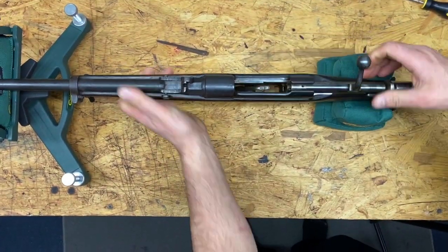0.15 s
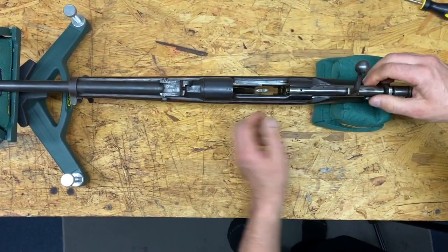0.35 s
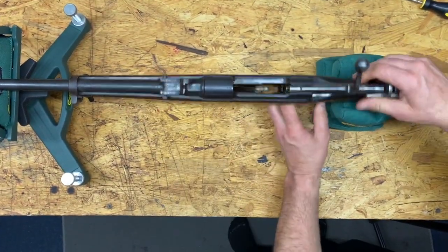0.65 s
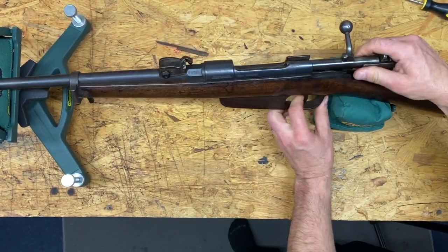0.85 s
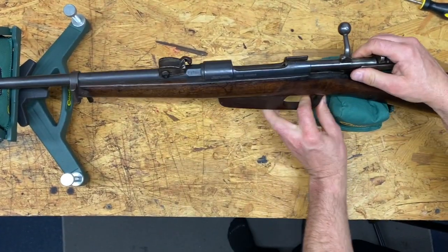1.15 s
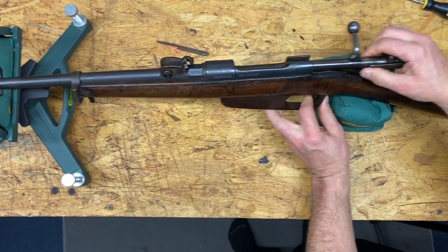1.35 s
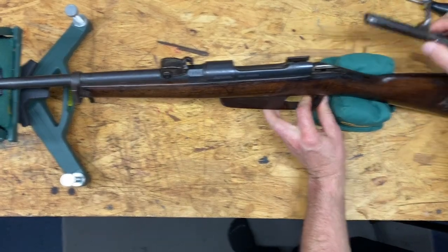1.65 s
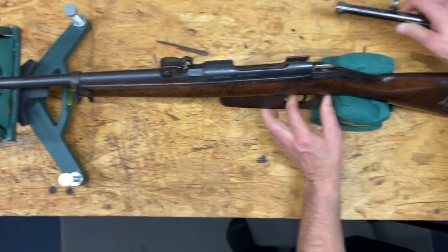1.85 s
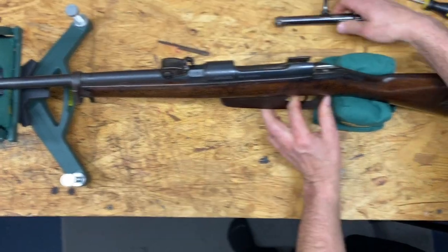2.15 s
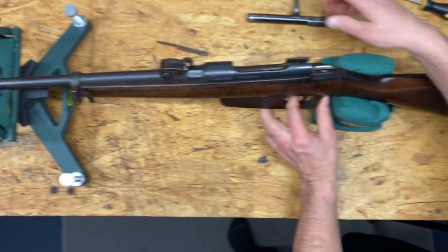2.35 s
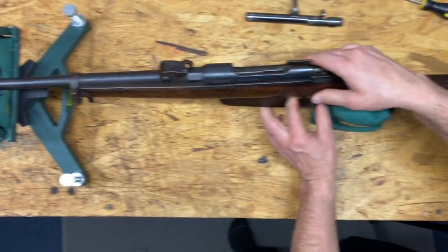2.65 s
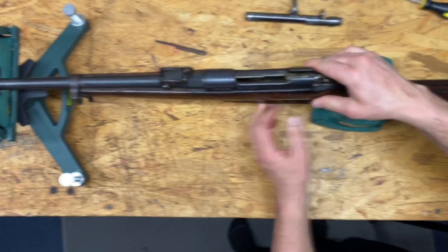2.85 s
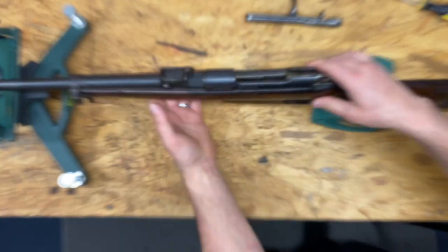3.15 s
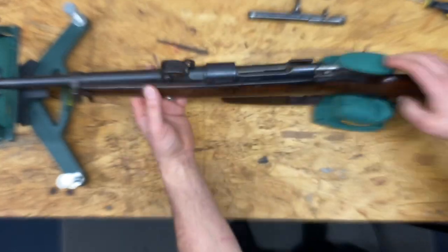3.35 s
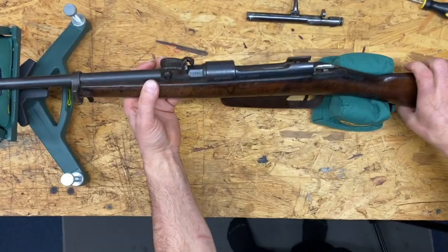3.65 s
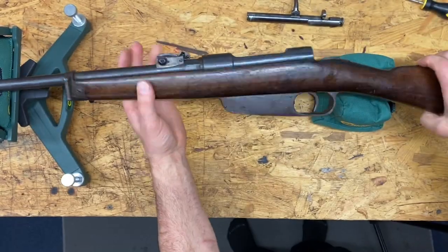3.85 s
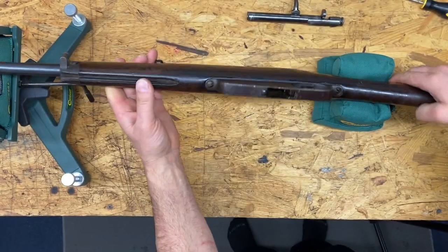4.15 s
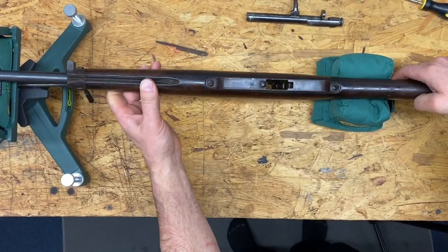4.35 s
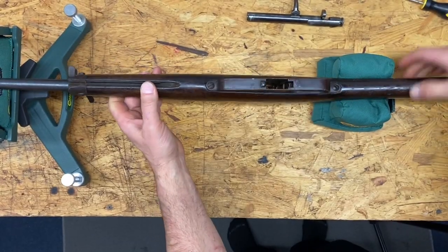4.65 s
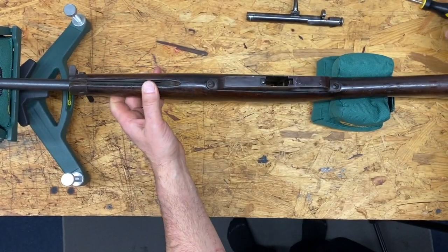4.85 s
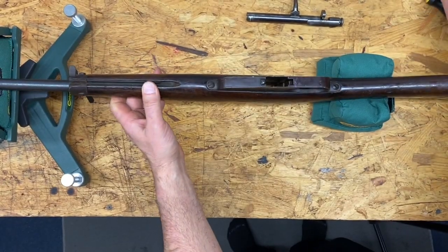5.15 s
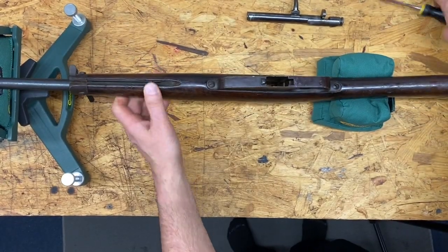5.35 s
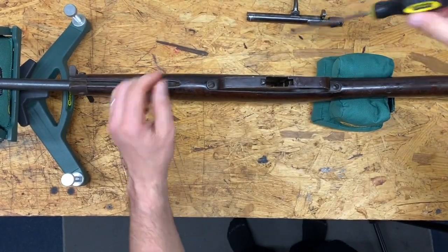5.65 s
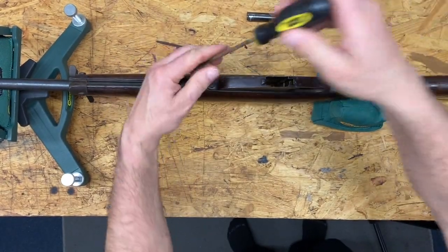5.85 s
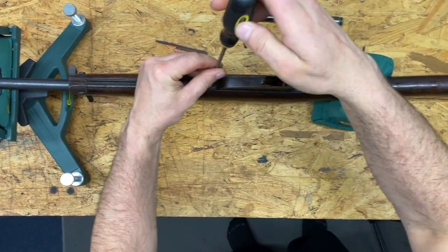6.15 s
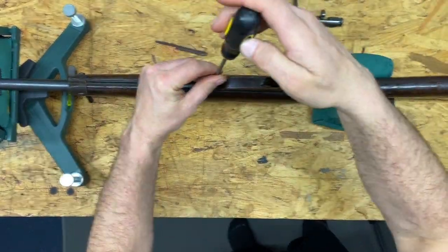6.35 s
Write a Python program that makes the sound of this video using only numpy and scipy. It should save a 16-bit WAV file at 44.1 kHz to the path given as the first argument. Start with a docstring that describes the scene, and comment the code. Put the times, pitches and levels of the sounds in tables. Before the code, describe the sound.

Close steel clicks and soft handling, a heavy wooden clunk as a bolt is set down, a short rasping scrape, two faint screw taps.

```python
"""A bolt-action rifle is handled on a wooden workbench in a small room, heard close up.
Its bolt is opened, drawn out and laid on the boards: noise clatter plus ringing modes for each contact.
The rifle is rolled over on its bag and scrapes in its rest, as stick-slip noise through resonances.
A screwdriver taps twice on a screw. The bench booms in low decaying sines and trembles as filtered noise;
hands stroke the stock in swells of noise, dry ticks snap, and a faint whine of sines comes and goes."""
import sys
import numpy as np
from scipy import signal
from scipy.fft import rfft, irfft, next_fast_len
from scipy.io import wavfile
from scipy.ndimage import uniform_filter1d, map_coordinates

SR = 44100
rng = np.random.default_rng(int(sys.argv[2]) if len(sys.argv) > 2 else 0)


def unload_wav(signal):
    """Save mono or channel-first audio to the path in sys.argv[1] as 16-bit WAV at rate SR, clipped to [-1, 1]."""
    wavfile.write(
        sys.argv[1],
        SR,
        np.round(np.clip(np.atleast_2d(signal).T, -1, 1) * 32767).astype(np.int16),
    )


N = 286650  # length in samples
SCENE_T = np.arange(N) / SR  # seconds through the scene
T = np.arange(SR * 3 // 5) / SR  # seconds through one hit
TOP_HZ = 16300  # upper band limit


def amp(db):
    """Decibels to gain."""
    return 10 ** (np.asarray(db) / 20)


def unit(x):
    """Scale to rms 1."""
    return x / np.sqrt(np.mean(x ** 2) + 1e-20)


def fade(t60):
    """Exponential decay over one hit, falling 60 dB in t60 seconds."""
    return np.exp(-np.log(1000) * T / t60)


def along(points, hz):
    """Interpolate (Hz, value) points on a log frequency axis."""
    f, v = np.transpose(points)
    return np.interp(np.log(hz + 1), np.log(f + 1), v)


def curves(rows):
    """One value per sample for each column after the time."""
    s, *columns = np.transpose(rows)
    return [np.interp(SCENE_T, s, column) for column in columns]


def wobble(rate):
    """A smooth random curve, rate knots a second."""
    knots = rng.standard_normal(int(N * rate / SR) + 4)
    return map_coordinates(knots, [np.arange(N) * rate / SR])


def filtered(x, response):
    """Multiply the spectrum of x by a response of frequency."""
    n = x.shape[-1]
    m = next_fast_len(n + SR // 8)
    return irfft(rfft(x, m) * response(np.fft.rfftfreq(m, 1 / SR)), m)[..., :n]


def colour(points):
    """Response through (Hz, dB) points."""
    return lambda hz: amp(along(points, hz))


def body(peaks):
    """Causal response of (Hz, width in Hz, dB) resonances, summed with alternating sign."""
    def response(f):
        total = 0
        for k, (centre, width, db) in enumerate(peaks):
            damping = 1j * f * width
            total = total + (-1) ** k * amp(db) * damping / (centre * centre - f * f + damping)
        return total
    return response


def causal(x, points):
    """Minimum-phase filter through (Hz, dB) points: nothing sounds before the blow."""
    m = next_fast_len(x.shape[-1] + SR // 8)
    cepstrum = irfft(np.log(colour(points)(np.fft.rfftfreq(m, 1 / SR))), m)
    cepstrum[1:m // 2] *= 2  # fold the spectrum's phase forward in time
    cepstrum[m // 2 + 1:] = 0
    return irfft(rfft(x, m) * np.exp(rfft(cepstrum)), m)[..., :x.shape[-1]]


# How alike left and right are. Each row: frequency in Hz, likeness from 0 to 1.
ALIKE = [(60, 0.98), (150, .95), (350, 1), (700, 0.33), (1400, 0.25), (3000, 0.52), (6000, 0.16),
         (10000, 0.12)]
# How the stereo image leans. Each row: frequency in Hz, left minus right in dB.
LEAN = [(60, 1.7), (300, -1.5), (700, -0.5), (1400, 0.5), (3000, 3.5), (6000, 1.5), (10000, 0)]


def spread(pair):
    """Blend two unrelated signals into left and right: alike in the bass, mostly unrelated in the treble."""
    def mid_side_gains(hz):
        turn = np.arccos(np.clip(along(ALIKE, hz), -1, 1)) / 2
        return np.array([np.cos(turn), np.sin(turn)])
    mid, side = filtered(pair, mid_side_gains)
    left_right = np.array([mid + side, mid - side])
    return filtered(left_right, lambda hz: amp(np.outer([.5, -.5], along(LEAN, hz))))


def noise(response, size, grain_db=0):
    """A pair of coloured noises of rms 1; grain_db clumps them into tiny slips."""
    clumps = np.repeat(rng.standard_normal(size // 32 + 1), 32)[:size]
    return unit(filtered(rng.standard_normal((2, size)) * amp(grain_db * clumps), response))


def peak(x):
    """Highest rms over 4 ms of the mean of the two channels."""
    return np.sqrt(np.max(uniform_filter1d(x.mean(0) ** 2, SR // 250)) + 1e-20)


def add(track, s, sound):
    """Mix a sound into the track at time s."""
    start = max(round(s * SR), 0)
    part = track[:, start:start + sound.shape[-1]]
    part += sound[..., :part.shape[-1]]


# Decay of the small room. Each row: frequency in Hz, t60 in seconds.
ROOM = [(150, 0.37), (400, 0.2), (1000, 0.16), (4000, 0.16), (8000, 0.12), (14000, 0.11)]


def room_tail():
    """A pair of diffuse noise tails, scaled to energy 1 on the first; the treble dies first."""
    hz, t, z = signal.stft(rng.standard_normal((2, len(T))), SR, nperseg=256)
    decay = np.exp(-np.log(1000) * t / along(ROOM, hz)[:, None])
    tail = signal.istft(z * decay, SR, nperseg=256)[1][:, :len(T)]
    tail = tail * (1 - fade(0.013))  # the tail builds up gently
    return tail / np.linalg.norm(tail[0])


def in_room(x, room_db):
    """The sound plus the room's diffuse answer."""
    return x + amp(room_db) * signal.fftconvolve(x[:1], room_tail(), axes=1)[:, :x.shape[-1]]


def walls(pair, echo_db, count=10):
    """Weak early echoes off the bench and walls ripple the spectrum."""
    echoes = np.zeros((2, SR // 50))
    for channel in echoes:
        delays = rng.integers(SR // 1000, len(channel), count)
        channel[delays] = amp(echo_db) * rng.standard_normal(count)
    echoes[:, 0] = 1  # direct sound
    echoes /= np.linalg.norm(echoes, axis=1, keepdims=True)
    return signal.fftconvolve(pair, echoes, axes=1)[:, :N]


def swell(s, half_s):
    """A bell-shaped rise and fall around time s."""
    return np.exp(-.5 * ((SCENE_T - s) / half_s) ** 2)


def lagging(x, lag_s):
    """A level that follows x and dies away after it."""
    keep = np.exp(-1 / (lag_s * SR))
    return signal.lfilter([1 - keep], [1, -keep], x)


# Bands that set a contact's hardness: body, knock, clink, edge. Each row: low edge in Hz, high edge in Hz.
BANDS = [(150, 600), (600, 2000), (2000, 6000), (6000, 16000)]
TOP_FALL = 0.28  # share of the drop from clink to edge that continues above


def strikes(rows, modes, crack_colour, crack_t60, ring_db, room_db, scatter_db, attack_s):
    """Each contact is a short clatter plus the object's modes; hardness sets the balance from body to edge."""
    track = np.zeros((2, N))
    hz, level, t60 = np.transpose(modes)
    # loose, hand-held parts blur their modes: the phase drifts
    drift = np.cumsum(rng.standard_normal((len(hz), len(T))), 1) * np.sqrt(2 * np.pi * .008 * hz[:, None] / SR)
    waves = np.exp(1j * (2 * np.pi * hz[:, None] * T + drift)) * fade(t60[:, None])
    for s, *levels_db in rows:
        sizes = amp(level + scatter_db * rng.standard_normal(len(hz)))
        phases = np.exp(2j * np.pi * rng.random((2, len(hz))))
        ring = ((sizes * phases) @ waves).real / np.linalg.norm(amp(level))
        clatter = in_room(noise(colour(crack_colour), len(T)) * fade(crack_t60), room_db)
        hit = spread(clatter + amp(ring_db) * ring) * (1 - fade(attack_s))
        hardness = []
        for (lo, hi), db in zip(BANDS, levels_db):
            band = filtered(hit, lambda f: (f > lo) & (f < hi))
            hardness.append((np.sqrt(lo * hi), db - 20 * np.log10(peak(band))))
        # small parts radiate no deep bass
        bass = [(25, hardness[0][1] - 30), (100, hardness[0][1])]
        # the softer the contact, the faster its highest treble falls away
        top = [(TOP_HZ, hardness[-1][1] + TOP_FALL * min(levels_db[-1] - levels_db[-2], 0))]
        add(track, s, causal(hit, bass + hardness + top))
    return track


# When the rifle lies untouched: from and to, in seconds.
HANDS_OFF = (5.43, 5.9)
LET_GO_S = .1  # time to take hold or let go
FIDGET_DB, FIDGET_PER_S = 4, 6.3  # the hold is never quite steady


def holding():
    """About 1 while the hands hold the rifle, 0 while it lies untouched."""
    off, on = HANDS_OFF
    grip = np.clip(np.maximum(off - SCENE_T, SCENE_T - on) / LET_GO_S + .5, 0, 1)
    return grip * amp(FIDGET_DB * wobble(FIDGET_PER_S))


# The stock rocking on its bag. Each row: middle in seconds, level in dB.
SHIFTS = [(0.009, -44.5), (0.089, -55), (0.155, -59), (0.235, -45.5), (0.285, -49), (0.572, -49.5),
          (0.681, -37.5), (0.95, -48.5), (1.32, -52.5), (1.4, -44.5), (2.2, -28), (2.809, -36.5),
          (3.356, -36), (3.409, -51), (4.34, -51.5), (5.1, -46.5)]
SHIFT_HALF_S = 0.017  # half length of a rock


def rocking():
    """How hard the stock presses into its bag, as a chain of short swells."""
    return sum(amp(db) * swell(s, SHIFT_HALF_S) for s, db in SHIFTS)


# A hand or the oiled bolt slides. Each row: middle in seconds, half length in seconds, hiss in dB, rub in dB.
STROKES = [(0.0, 0.027, -52.5, -45.5), (0.132, 0.071, -60, -60.5), (0.246, 0.0082, -63.5, -59),
           (0.575, 0.016, -51.5, -51), (0.693, 0.012, -62, -47), (0.751, 0.086, -60, -57),
           (0.934, 0.035, -56, -53), (1.05, 0.056, -69, -64), (1.338, 0.023, -58, -47.5),
           (1.417, 0.016, -50, -39.5), (2.216, 0.038, -70.5, -48), (2.597, 0.065, -73.5, -76),
           (2.717, 0.026, -69, -72), (2.804, 0.027, -77, -59.5), (3.04, 0.093, -70, -67),
           (3.25, 0.11, -67.5, -65.5), (3.344, 0.025, -53.5, -50.5), (3.526, 0.044, -67.5, -78.5),
           (3.655, 0.037, -62.5, -66.5), (3.799, .033, -63, -76.5), (3.958, 0.096, -70.5, -70),
           (4.154, 0.023, -60.5, -61), (4.264, 0.07, -58.5, -56), (4.46, 0.076, -68.5, -70.5),
           (4.823, 0.023, -62, -62.5), (4.968, 0.17, -69.5, -75.5), (5.104, 0.014, -51, -63),
           (5.843, 0.011, -69, -82), (6.098, 0.17, -76.5, -70.5), (6.287, 0.0082, -61, -55.5),
           (6.422, 0.068, -83, -71)]
# Colour of the skin hiss. Each row: frequency in Hz, relative level in dB per Hz.
SKIN = [(1400, -23.5), (2600, -1.5), (4500, -4.5), (7500, 0.5), (9000, -17.5), (10300, -0.5), (12000, -6.5),
        (13200, -15), (14500, -7), (16000, -8.5)]
# Colour of the rub. Each row: frequency in Hz, relative level in dB per Hz.
RUB = [(350, -22.5), (650, 0), (950, -3.5), (1300, -0.5), (2200, -3), (3200, -8.5), (4500, -9),
       (7000, -35.5)]
# Colour of the stock on its bag. Each row: frequency in Hz, relative level in dB per Hz.
STOCK = [(90, -27), (150, -6), (200, -2), (255, -8.5), (320, 4), (375, -3.5), (450, -14), (600, -14.5),
         (800, -25.5), (1500, -62)]
HOLD_HISS_DB, HOLD_RUB_DB, HOLD_STOCK_DB = -82.5, -82, -68.5  # hands merely holding the rifle
SETTLE_DB, SETTLE_S = -15.5, 0.14  # the bag's filling settles after a rock


def hands():
    """Skin hisses, oiled parts slide and the stock rocks on its bag: grainy noises that swell and let go."""
    hold, rock = holding(), rocking()
    hiss, rub = amp(HOLD_HISS_DB) * hold, amp(HOLD_RUB_DB) * hold
    for s, half_s, hiss_db, rub_db in STROKES:
        speed = swell(s, half_s)
        hiss = np.hypot(hiss, amp(hiss_db) * speed)
        rub = np.hypot(rub, amp(rub_db) * speed)
    stock = amp(HOLD_STOCK_DB) * hold + rock + amp(SETTLE_DB) * lagging(rock, SETTLE_S)
    friction = hiss * noise(colour(SKIN), N, grain_db=2.0)
    friction += rub * noise(colour(RUB), N, grain_db=2.5)
    friction += stock * noise(colour(STOCK), N, grain_db=1.5)
    flicker = amp(0.79 * wobble(51))
    return walls(spread(friction * flicker), echo_db=-15.0)


# Colour of the trembling bench. Each row: frequency in Hz, relative level in dB.
TREMBLE_COLOUR = [(20, -22.5), (40, -10.5), (56, -7.5), (67, 6.5), (76, -8.5), (88, 2.5), (105, -2),
                  (125, -13.5), (170, -14), (260, -39.5), (400, -63.5)]
TREMBLE_IDLE_DB, TREMBLE_HELD_DB = -65, -56.5  # the bench alone, and what the hands add
TREMBLE_SHIFT_DB, TREMBLE_DRAG_DB, TREMBLE_LAG_S = 2, -4, .16  # its answer to the rocking stock and the drag


def tremble():
    """The bench trembles under the hands as low noise, more when the stock rocks or drags."""
    dragging = amp(curves(DRAG)[0]) * curves(DRAG_CONTACT)[0]
    load = lagging(amp(TREMBLE_SHIFT_DB) * rocking() + amp(TREMBLE_DRAG_DB) * dragging, TREMBLE_LAG_S)
    level = amp(TREMBLE_IDLE_DB) + (amp(TREMBLE_HELD_DB) + load) * holding()
    return spread(level * noise(colour(TREMBLE_COLOUR), N))


# Colour of the still air. Each row: frequency in Hz, relative level in dB per Hz.
AIR = [(59, -39), (100, -9), (219, -14.5), (266, -9.5), (322, -24), (358, -16.5), (492, -32.5),
       (8830, -49.5), (9610, -46.5), (16000, -51.5)]
AIR_DB = -68
# Partials of the whine. Each row: frequency in Hz, rms level in dB before the spell's gain.
WHINE = [(947.5, -82), (1895, -84.5), (4032, -81.5), (5932, -78), (6438, -95), (7117, -87), (10912, -84.5),
         (12096, -99), (13997, -100)]
# When the whine is up. Each row: from and to in seconds, gain in dB.
WHINE_SPELLS = [(1.5, 2.95, 1.5), (6.308, 6.504, -6)]
WHINE_RISE_DB_PER_S, WHINE_FALL_DB_PER_S = 37, 25


def background():
    """Still room air as steady noise, and a faint whine of steady sines that fades in and out."""
    level = 0
    for start, end, db in WHINE_SPELLS:
        before = WHINE_RISE_DB_PER_S * np.maximum(start - SCENE_T, 0)
        after = WHINE_FALL_DB_PER_S * np.maximum(SCENE_T - end, 0)
        level = level + amp(db - before - after)
    whine = sum(np.sqrt(2) * amp(db) * np.sin(2 * np.pi * hz * SCENE_T) for hz, db in WHINE)
    return spread(amp(AIR_DB) * noise(colour(AIR), N)) + level * whine


# Weight landing on the bench.
# Each row: start in seconds, then gains in dB of the boom, the dull push and the upper mode.
THUMPS = [(0.004, -37, -44, -31), (0.247, -38, -31.5, -29), (0.539, -25.5, -52, -39),
          (0.638, -27.5, -21.5, -20), (0.938, -32, -40, -44.5), (1.361, -25, -33, -26.5),
          (1.718, -41.5, -65, -56), (2.013, -17, -38, -15.5), (2.245, -17, -30.5, -11.5),
          (2.585, -42, -41, -30.5), (2.826, -32, -37, -30), (3.248, -37, -53, -36),
          (3.38, -40.5, -55, -30.5), (4.343, -44, -20.5, -36), (4.4, -31, -30, -42.5),
          (4.913, -31.5, -55, -28.5), (5.15, -38, -51.5, -32), (5.956, -31.5, -30.5, -44),
          (6.122, -31.5, -30, -51), (6.409, -38.5, -62.5, -37)]
# Two modes of the bench frame. Each row: frequency in Hz, t60 in seconds.
FRAME = [(68, 0.79), (88, 0.26)]


def bench():
    """A load gives one dull push, then the frame booms in two low modes."""
    track = np.zeros((2, N))
    (low_hz, low_t60), (high_hz, high_t60) = FRAME
    u = T - .015  # the push is centred 15 ms in
    push = np.cos(2 * np.pi * 61 * u) * np.exp(-.5 * (u / .009) ** 2) * (1 - fade(0.016))
    for s, boom_db, push_db, upper_db in THUMPS:
        boom = amp(boom_db) * np.sin(2 * np.pi * low_hz * T) * fade(low_t60)
        upper = amp(upper_db) * np.sin(2 * np.pi * high_hz * T) * fade(high_t60)
        add(track, s, (boom + upper) * (1 - fade(0.07)) + amp(push_db) * push)
    return track


# Steel contacts of bolt, receiver and rest.
# Each row: start in seconds, then levels in dB of body, knock, clink and edge.
ACTION = [(0.271, -44.5, -45, -65, -76), (0.469, -59, -53.5, -67, -80), (0.508, -32.5, -35, -40, -55),
          (0.601, -40, -43.5, -52, -62), (0.616, -33.5, -57, -37.5, -52), (0.682, -37, -39, -63, -78),
          (0.815, -51.5, -46.5, -61, -56.5), (0.913, -46, -33.5, -55, -74), (1.044, -59, -47.5, -74, -78),
          (1.066, -69, -33.5, -38.5, -56.5), (1.343, -46.5, -30, -26.5, -40), (1.347, -40.5, -26, -44, -74),
          (1.414, -48, -25.5, -29, -39), (1.439, -40, -33.5, -30.5, -35), (1.69, -58, -41, -46.5, -63.5),
          (3.904, -74, -64, -59, -60.5), (4.984, -41.5, -29.5, -49.5, -80), (5.031, -46.5, -35.5, -53, -99),
          (5.14, -34, -37, -47, -54), (5.189, -38.5, -45, -40, -52), (5.228, -38, -38.5, -33, -52.5),
          (5.27, -36.5, -38, -40.5, -45), (5.314, -48, -33, -39, -49.5)]
# Modes of the barrelled action. Each row: frequency in Hz, relative level in dB, t60 in seconds.
STEEL = [(232, -1.5, 0.15), (396, -2.5, 0.28), (595.4, 0.5, 0.19), (816, -10.5, 0.1), (970, -6, 0.18),
         (1119, 6, 0.023), (1308, 9, 0.067), (1520, 4.5, 0.079), (1633, 7.5, 0.088), (2108, 6.5, 0.17),
         (2775, -2, 0.1), (3290, -18, 0.069), (3830, 9, 0.057), (4430, -4, 0.2), (5060, 0.5, 0.14),
         (6740, -25, 0.1)]
# Colour of the steel clatter. Each row: frequency in Hz, relative level in dB per Hz.
STEEL_CRACK = [(88, -18), (150, -2), (466, -14.5), (1600, -4), (1790, -12), (2060, -6), (3700, -1),
               (4080, -2), (7920, -9.5), (9080, -32.5), (11000, -10.5), (12900, -36), (16000, -19)]


def rifle():
    """The bolt clacks against the receiver and the rifle against its rest: clatter over steel modes."""
    return strikes(ACTION, STEEL, STEEL_CRACK, crack_t60=0.044, ring_db=-11.5, room_db=-6,
                   scatter_db=3, attack_s=.005)


# Bolt and stock knocking on the boards.
# Each row: start in seconds, then levels in dB of body, knock, clink and edge.
KNOCKS = [(0.512, -35, -39.5, -58, -53.5), (0.616, -32.5, -31.5, -58, -55), (0.626, -26.5, -49, -78, -79),
          (2.011, -18, -36.5, -39, -54), (2.017, -19, -34.5, -43.5, -60), (2.071, -35.5, -45.5, -51.5, -69),
          (2.121, -36, -44.5, -45, -70.5), (2.149, -25, -43, -54, -67), (2.172, -24.5, -48.5, -49.5, -70.5),
          (2.186, -27, -42.5, -61, -77), (2.237, -8, -6.5, -18.5, -53), (2.245, -14, -19, -23.5, -22.5),
          (2.34, -22, -30.5, -48.5, -56.5), (2.378, -34.5, -39, -66, -76), (2.427, -25.5, -37, -57, -73),
          (2.583, -31, -56, -87, -73), (2.65, -48.5, -63.5, -80, -82), (2.831, -35, -57, -73, -92)]
# Modes of the bench boards. Each row: frequency in Hz, relative level in dB, t60 in seconds.
BOARDS = [(117.6, -3.5, 0.13), (140, -4, 0.24), (186.5, -9, 0.81), (250, 2, 0.064), (282.5, 0.5, 0.13),
          (287, -8, 0.16), (345, -6, 0.31), (393.8, 4, 0.15), (541, -1, 0.2), (685, -3.5, .11),
          (750, -3.5, 0.1), (820, -2, 0.07), (966, -2.5, 0.14), (1025, -2.5, 0.051), (1233, 1.5, 0.16),
          (1399, -9, 0.058), (1557, -3, 0.11), (1550, -11.5, .08), (1756, -6.5, 0.057), (1888, -8, 0.097),
          (1990, -9.5, 0.048), (2330, -10, 0.061), (3800, -13, 0.1), (3890, -19.5, .07)]
# Colour of the wooden clatter. Each row: frequency in Hz, relative level in dB per Hz.
WOOD_CRACK = [(59, -26), (100, 1.5), (206, -14.5), (398, -7), (481, -19), (547, -15), (970, -5.5),
              (1100, -21.5), (1910, -20), (2470, -36), (3100, -38.5), (3800, -32), (4470, -39.5),
              (7290, -34), (9000, -46.5), (11000, -33.5), (16000, -44.5)]


def boards():
    """The bolt touches down, rolls, falls over on its knob and bounces: each knock rings the boards' modes."""
    return strikes(KNOCKS, BOARDS, WOOD_CRACK, crack_t60=.04, ring_db=-7.5, room_db=-7.5,
                   scatter_db=2.5, attack_s=0.0043)


# Tiny dry ticks. Each row: start in seconds, level in dB before the left-right gains.
TICKS = [(2.9388, -37.5), (2.9729, -43.5), (2.9841, -39), (3.041, -38.5), (3.051, -40), (3.0624, -40),
         (3.1289, -43), (6.0893, -62), (6.4808, -50), (6.4964, -35.5)]
# Colour of a tick. Each row: frequency in Hz, relative level in dB.
TICK_COLOUR = [(1000, -20), (2200, -14), (3200, -1.5), (4200, 6), (5800, -8.5), (7200, -6), (9200, -22.5),
               (11200, -4), (13500, -23), (16000, -15)]


def ticks():
    """Dry ticks about a millisecond long, a little to the left: filtered impulses, each tinted afresh."""
    track = np.zeros((2, N))
    snap = signal.unit_impulse(SR // 100, "mid")
    for s, db in TICKS:
        tint = [(hz, level + 2 * rng.standard_normal()) for hz, level in TICK_COLOUR]
        tick = filtered(snap, lambda hz: 1j * colour(tint)(hz))[None]
        left_right = amp([[2], [-4.5]])
        add(track, s - .004, tick / peak(tick) * amp(db) * left_right)
    return track


# The rifle dragged in its rest. Each row: time in seconds, then levels in dB of groan, rasp and hiss.
DRAG = [(5.08, -73, -50, -70), (5.104, -44, -44.5, -57), (5.144, -32.5, -31.5, -39),
        (5.198, -31.5, -37.5, -41.5), (5.22, -43, -54, -69), (5.228, -47, -37.5, -43),
        (5.285, -39.5, -33, -32), (5.32, -56, -43, -44), (5.42, -64, -67, -74)]
# Contact with the rest. Each row: time in seconds, share of contact from 0 to 1.
DRAG_CONTACT = [(5.07, 0.0024), (5.11, 0.93), (5.37, 1), (5.47, 0)]
# Low resonances of the rest. Each row: frequency in Hz, width in Hz, relative level in dB.
GROAN = [(145.6, 32, -0.5), (254.6, 24, 4), (378, 12, 2), (425, 23, -9), (553, 25, -2.5)]
# Upper resonances of the rest. Each row: frequency in Hz, width in Hz, relative level in dB.
RASP = [(690, 44, 2.5), (947, 230, -37), (1074, 210, -10.5), (1304, 28.3, 5.5), (1440, 45, -5.5),
        (1720, 156, -1), (1844, 73, -1), (2220, 140, -11)]
# Colour of the scrape's hiss. Each row: frequency in Hz, relative level in dB per Hz.
DRAG_HISS = [(1200, -6), (2200, 14.5), (3000, 4.5), (4200, 3), (4900, -6), (5500, 10), (6300, -27),
             (7900, 1), (9000, -49), (11000, -9.5), (13000, -27), (15000, -23)]
# The stock juddering in the rest. Each row: start in seconds, gain in dB, pitch in Hz.
JUDDERS = [(5.109, -23, 431), (5.139, -19.5, 385), (5.196, -19, 431)]


def drag():
    """The rifle sticks and slips in its rest; uneven slips excite the rest's resonances."""
    groan_db, rasp_db, hiss_db = curves(DRAG)
    contact, = curves(DRAG_CONTACT)
    slips_per_s = 130 * amp(3.7 * wobble(80))
    since_slip = np.cumsum(slips_per_s) / SR % 1  # 0 at each slip, rising to 1
    slips = rng.standard_normal((2, N)) * amp(-10 * since_slip + 2 * wobble(70))
    groan = amp(groan_db) * unit(filtered(slips, body(GROAN)))
    rasp = amp(rasp_db) * unit(filtered(slips, body(RASP)))
    hiss = amp(hiss_db) * unit(filtered(slips, colour(DRAG_HISS)))
    scrape = (groan + rasp + hiss) * contact
    for s, db, hz in JUDDERS:
        add(scrape, s, amp(db) * np.sin(2 * np.pi * hz * T) * fade(0.06) * (1 - fade(.03)))
    return walls(spread(in_room(scrape, room_db=-9)), echo_db=-13.0)


# Screwdriver tip meeting the screw.
# Each row: start in seconds, then levels in dB of body, knock, clink and edge.
TAPS = [(5.943, -46, -42.5, -49.5, -68), (6.11, -44.5, -42.5, -51, -66)]
# Modes of screwdriver on screw. Each row: frequency in Hz, relative level in dB, t60 in seconds.
SCREW = [(538, -1.5, 0.18), (579, 8.5, 0.11), (690, -18, 0.093), (775, -10.5, 0.1), (1023, -18, 0.054),
         (1270, -27, .08), (1905, -12, 0.13), (2370, -10, 0.089), (2580, -4, 0.049), (3660, -24.5, 0.062),
         (3930, -18.5, 0.046), (5260, -9, 0.042)]
# Colour of the tip's clatter. Each row: frequency in Hz, relative level in dB per Hz.
TIP_CRACK = [(100, -34.5), (170, 7), (432, -10), (596, -13.5), (1380, -27), (1870, -16), (2950, -41),
             (3300, -21.5), (5310, -29), (7920, -46), (9220, -64.5), (11400, -40.5), (16000, -71.5)]
# Short pings of the blade. Each row: start in seconds, gain in dB.
PINGS = [(5.986, -42), (6.1528, -43.5)]


def screwdriver():
    """The tip taps the screw and rings its modes; the blade pings just after as a short sine."""
    track = strikes(TAPS, SCREW, TIP_CRACK, crack_t60=0.03, ring_db=-9.5, room_db=-7.5,
                    scatter_db=4.5, attack_s=0.0067)
    ping = np.sin(2 * np.pi * 4080 * T) * fade(0.019) * (1 - fade(0.0018))
    for s, db in PINGS:
        add(track, s, amp(db) * ping)
    return track


def scene():
    """Everything on the bench."""
    handling = hands() + tremble() + background() + bench()
    contacts = rifle() + boards() + ticks() + drag() + screwdriver()
    return handling + contacts


def record(dry):
    """High peaks are softly clipped, deep rumble is cut and the treble ends at the band limit."""
    clipped = dry / (1 + np.abs(dry / .88) ** 6) ** (1 / 6)
    rumble_cut = signal.butter(2, 26, "highpass", fs=SR, output="sos")
    cleaned = signal.sosfilt(rumble_cut, clipped)
    return filtered(cleaned, lambda hz: 1 / (1 + (hz / TOP_HZ) ** 120))


dry = scene()
out = record(dry)
unload_wav(out)
```